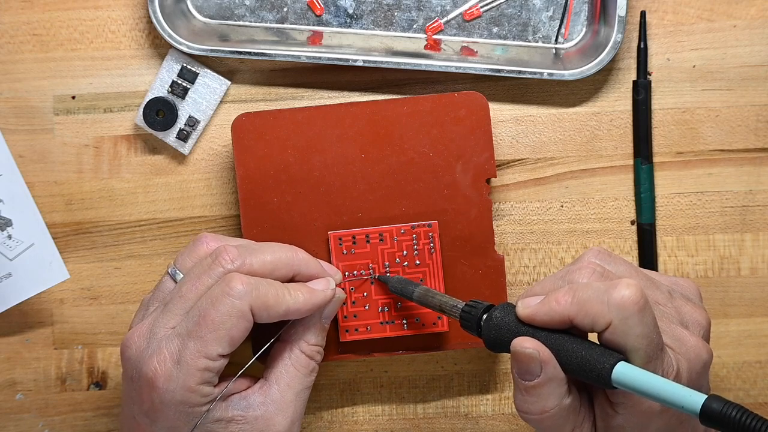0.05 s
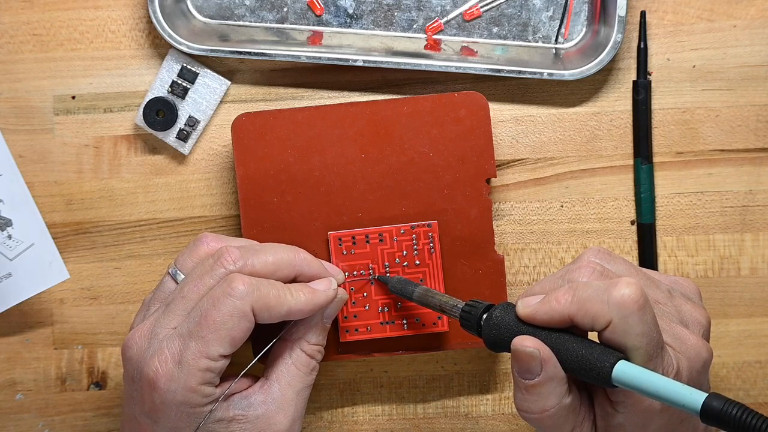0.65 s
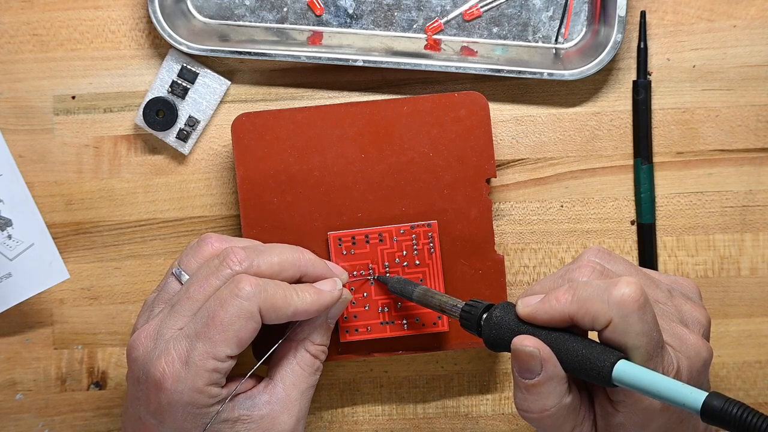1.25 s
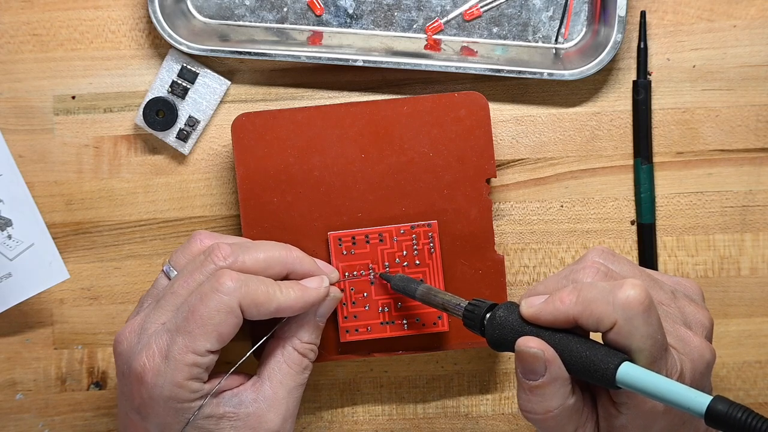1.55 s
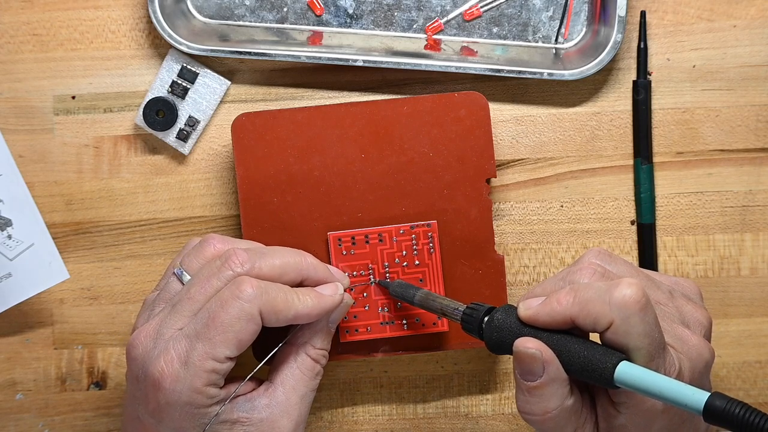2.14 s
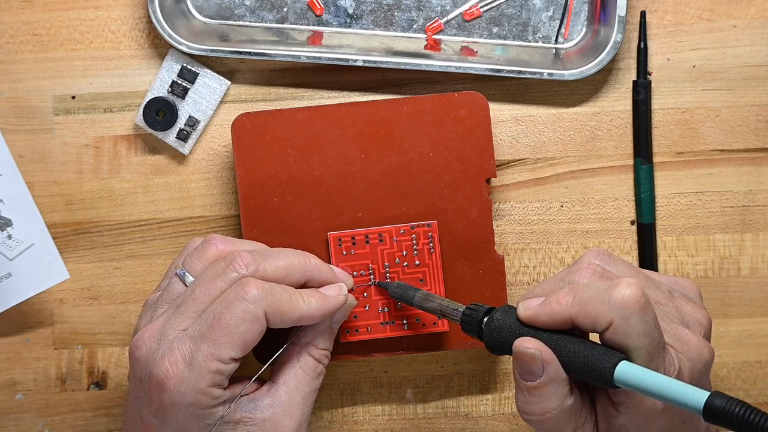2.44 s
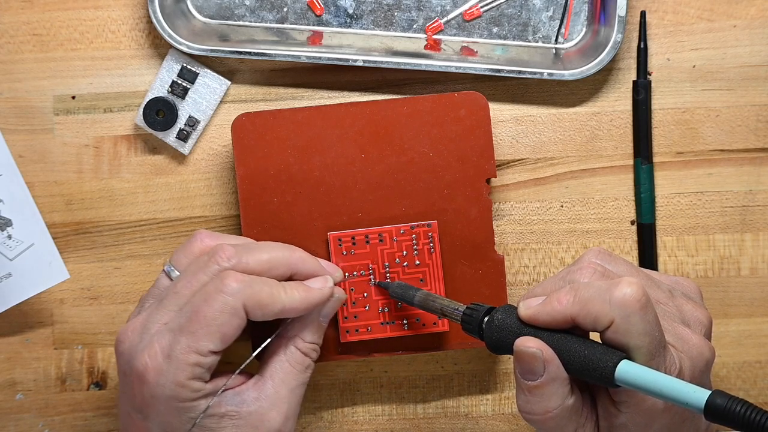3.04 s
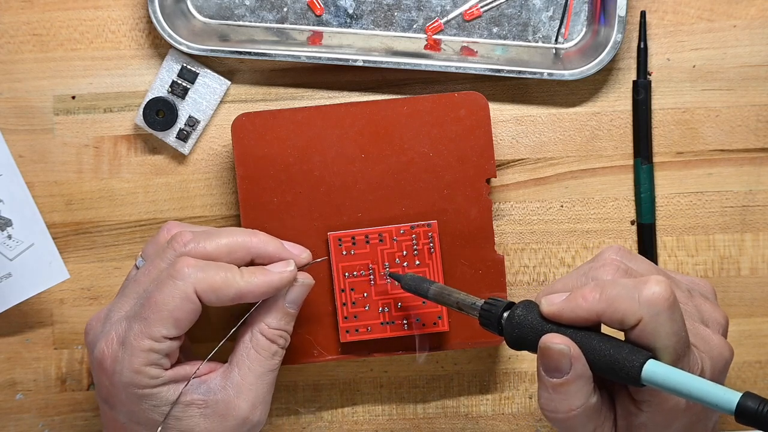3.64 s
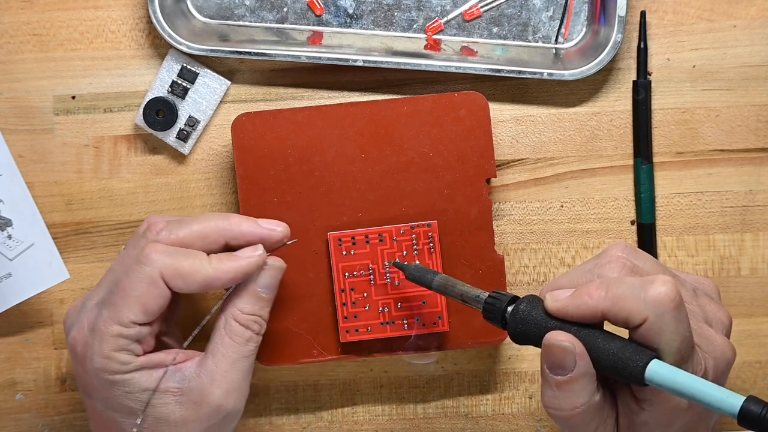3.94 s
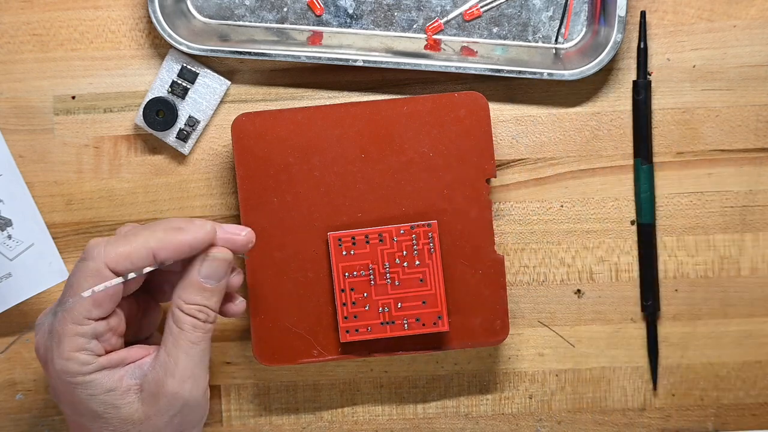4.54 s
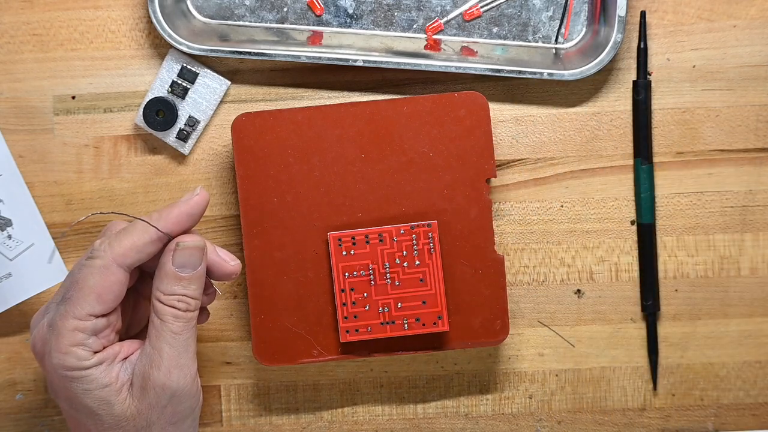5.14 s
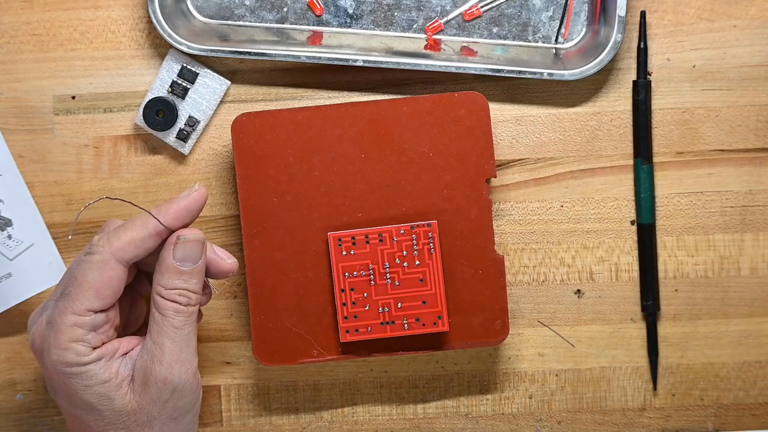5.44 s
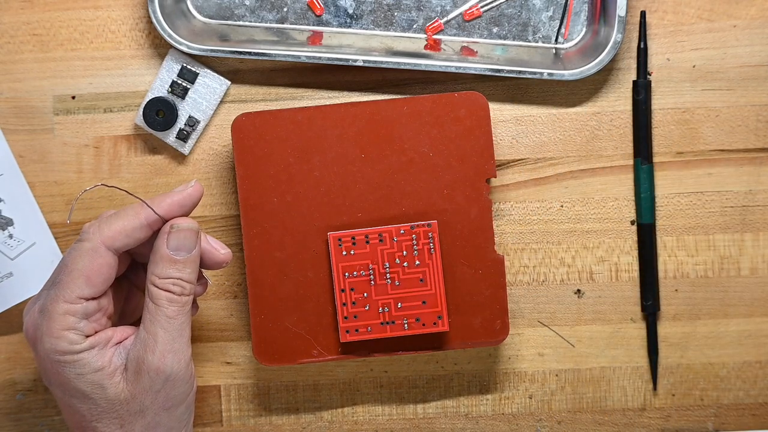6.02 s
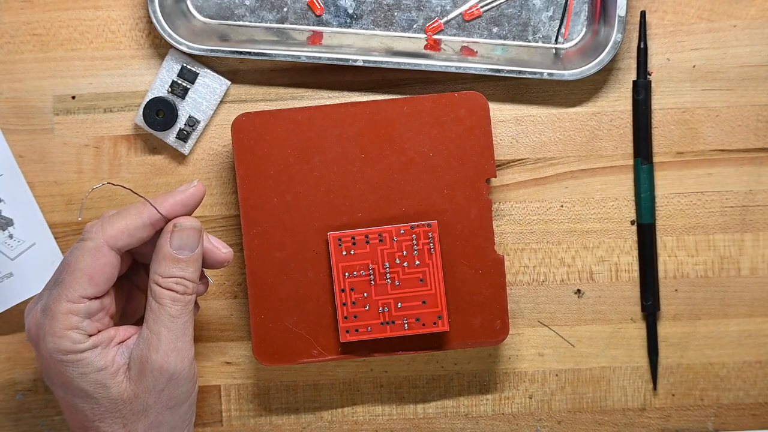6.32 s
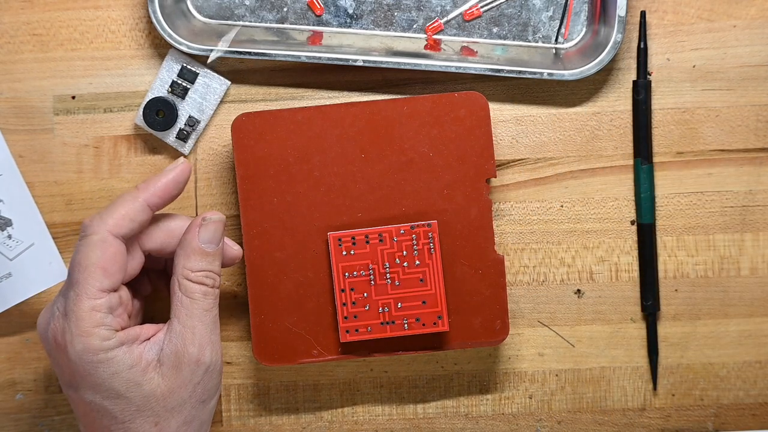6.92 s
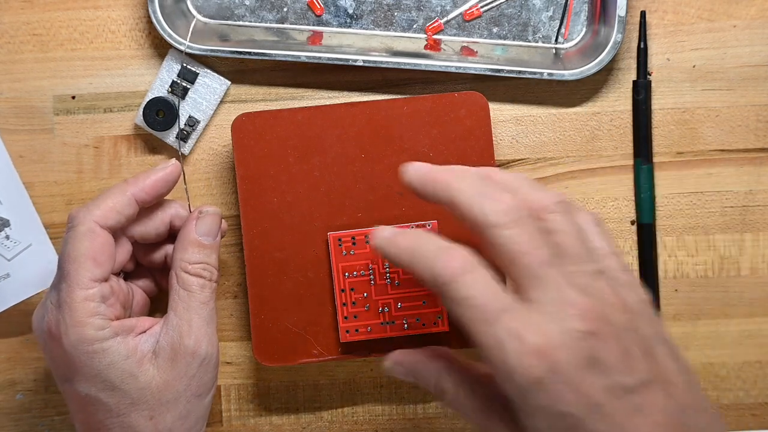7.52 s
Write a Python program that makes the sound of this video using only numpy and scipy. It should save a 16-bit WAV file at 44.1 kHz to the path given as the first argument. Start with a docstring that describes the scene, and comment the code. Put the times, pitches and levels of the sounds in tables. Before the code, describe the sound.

Quiet workroom air, microphone hiss, a low hum and a faint electronic whine run throughout; everything is small, close and nearly mono. At about 1.4 seconds a soldering iron's tip gives a very short, high, rising squeak on a pin, followed by a tiny puff of flux. Light ticks on the circuit board follow until 1.7 seconds, with fainter ones near 2.4 and 3.4. Around 4.2 seconds comes a cluster of sharper ticks, while a hand starts brushing softly over the wooden bench. Near 4.9 seconds the iron scrapes once in its metal stand, and the wood takes a knock at 5.5. From 6.1 to 6.7 seconds the iron scrapes and rattles in the stand, the metal ringing briefly over soft bench thuds. From 7.1 seconds a hand brushes toward the board, with a soft knock and three ticks around 7.6.

```python
"""Soldering at a wooden bench, in quiet room air, microphone hiss, hum and a faint electronic whine.
First the iron's tip squeaks on a pin by stick-slip, flux puffs, and the tip ticks on the circuit board.
From 4 s a hand brushes over the bench and the wood takes a few knocks. Near 4.9 s, and from 6.1 to 6.7 s,
the iron scrapes and rattles in its ringing metal stand while the bench top thuds. Last, a hand reaches
for the board, with a soft knock and three more ticks. The sound is close and nearly mono."""
import sys
import numpy as np
from scipy import signal
from scipy.fft import rfft, irfft, next_fast_len
from scipy.io import wavfile
from scipy.ndimage import uniform_filter1d, map_coordinates

SR = 44100
rng = np.random.default_rng(int(sys.argv[2]) if len(sys.argv) > 2 else 0)


def unload_audio(sound):
    """Save the sound as a 16-bit wav file, at the path given as the first command line argument."""
    columns = np.transpose(np.atleast_2d(sound))
    # keep every value between -1 and 1, then stretch to whole-number steps
    steps = np.round(np.clip(columns, -1, 1) * 32767)
    wavfile.write(sys.argv[1], SR, steps.astype(np.int16))


N = 342769

# spectrum of a contact on the board: f/Hz, level/dB
CONTACT_COLOUR = [(150, -31), (1000, -21), (2200, -12.5), (3500, -5.5), (6000, -2.5), (10400, 2.5),
                  (11800, -8), (16000, -15)]
# strokes of the iron in its stand: t/s, strike/dB, delay to hardest point/s, slide rise/s, slide/dB,
# loss per rebound/dB, ring/dB, thud/dB, thud t60/s
STAND_STROKES = [(4.8635, -37, .018, .012, -42, 16, -1.5, -47.5, .5),
                 (6.132, -41.5, .043, .022, -47, 22, 2, -41.5, .3),
                 (6.2163, -41.5, .012, .006, -48, 20, -9, -60, .2),
                 (6.236, -42, .032, .010, -47, 6, 3.5, -47, .22),
                 (6.380, -41.5, .027, .010, -39, 5.5, 5.5, -41, .42),
                 (6.564, -55, .010, .008, -51, 20, 3, -51, .3),
                 (6.576, -38.5, .012, .009, -33.5, 8, -.5, -44.5, .42),
                 (6.706, -63, .016, .014, -58.5, 20, 11, -43, .27)]


def amp(db):
    """Decibels to gain."""
    return 10 ** (np.asarray(db) / 20)


def unit(x):
    """Scale to rms 1."""
    return x / np.sqrt(np.mean(x ** 2) + 1e-20)


def along(points, hz):
    """(f/Hz, value) points read on a log axis."""
    f, v = np.transpose(points)
    return np.interp(np.log(hz + 1), np.log(f + 1), v)


def bump(hz, centre_hz, octaves):
    """Bell of height 1 in log frequency."""
    return np.exp(-.5 * (np.log2((hz + 1) / centre_hz) / octaves) ** 2)


def clock(size):
    """Sample times in seconds."""
    return np.arange(size) / SR


def fade(t, t60):
    """Exponential decay."""
    return np.exp(-np.log(1000) * t / max(t60, 1e-4))


def swell(t, middle_s, width_s):
    """Bell of height 1 in time."""
    return np.exp(-.5 * ((t - middle_s) / width_s) ** 2)


def envelope(t, rise_s, t60, hold_s=0):
    """Linear rise, hold, exponential release."""
    return np.minimum(t / max(rise_s, 1e-4), 1) * fade(np.maximum(t - rise_s - hold_s, 0), t60)


def filtered(x, response):
    """Zero-phase filter of gain response(hz)."""
    size = x.shape[-1]
    padded = next_fast_len(size + 8192)
    return irfft(rfft(x, padded) * response(np.fft.rfftfreq(padded, 1 / SR)), padded)[..., :size]


def causal(x, colour):
    """Minimum-phase filter of gain colour(hz) in dB."""
    size = len(x)
    cepstrum = irfft(np.log(amp(colour(np.fft.rfftfreq(size, 1 / SR)))), size)
    cepstrum[1:size // 2] *= 2
    cepstrum[size // 2 + 1:] = 0
    return irfft(rfft(x) * np.exp(rfft(cepstrum)), size)


def noise(colour, size):
    """Noise of rms 1, shaped by colour(hz) in dB."""
    return unit(filtered(rng.standard_normal(size), lambda hz: amp(colour(hz))))


def burst(shape):
    """Random force under an envelope, with that envelope's energy."""
    force = shape * rng.standard_normal(len(shape))
    return force * np.linalg.norm(shape) / np.linalg.norm(force)


def ring(modes, t, scatter_db):
    """Damped modes, struck with new strengths each time."""
    return sum(amp(db + scatter_db * rng.standard_normal()) * fade(t, t60)
               * np.sin(2 * np.pi * (hz * t + rng.random())) for hz, db, t60 in modes)


def add(track, at_s, sound):
    """Mix a sound into the track."""
    start = round(at_s * SR)
    track[start:start + len(sound)] += sound[:N - start]


def background():
    """Room air and microphone hiss, with steady mains hum and electronic whine."""
    # noise density: f/Hz, level/dB
    air = [(15, -55), (25, -30), (48, -13), (122, -1), (148, -13), (178, -2.5), (209, -4.5), (281, 1),
           (457, -3), (782, -3.5), (848, -5), (1570, -6.5), (5280, -10), (8130, -9), (15500, -10)]
    # resonances in the hiss: f/Hz, width/Hz, lift/dB
    hiss_peaks = [(8250, 180, 3.5), (9760, 550, 3.5)]
    # left-right likeness: f/Hz, correlation
    likeness = [(60, 1), (160, 0.81), (300, 0.9), (700, 0.67), (2000, 0.63), (5500, 0.71), (8000, 1),
                (15000, 1)]
    # hum and whine: f/Hz, rms level/dB
    tones = [(59, -81), (800, -82), (1600, -78), (2400, -80), (3200, -80), (8000, -72), (8800, -83),
             (9600, -82), (10001, -77), (12000, -80)]
    air_rms_db = -55.5

    def mid_side_gains(hz):
        peaks_db = sum(db / (1 + (2 * (hz - centre) / width) ** 2) for centre, width, db in hiss_peaks)
        angle = np.arccos(np.clip(along(likeness, hz), -1, 1)) / 2
        return amp(along(air, hz) + peaks_db) * [np.cos(angle), np.sin(angle)]

    mid, side = filtered(rng.standard_normal((2, N)), mid_side_gains)
    whine = sum(np.sqrt(2) * amp(db) * np.sin(2 * np.pi * (hz * clock(N) + rng.random()))
                for hz, db in tones)
    return amp(air_rms_db) * unit(np.array([mid + side, mid - side])) + whine


def room(x):
    """Short tail of a small workroom, nearly the same left and right."""
    # reverberation: f/Hz, t60 before scaling/s
    decay = [(200, 0.64), (2000, 0.15), (10000, 0.28)]
    t60_scale, predelay_samples = .81, 200
    hz, t, spectra = signal.stft(rng.standard_normal((2, SR // 2)), SR, nperseg=256)
    tail = signal.istft(spectra * fade(t / along(decay, hz)[:, None], t60_scale), SR, nperseg=256)[1]
    delayed = np.pad(x, (predelay_samples, 0))[None]
    mid, side = signal.fftconvolve(delayed, tail / np.linalg.norm(tail[0]), axes=1)[:, :N]
    return mid + amp(-32) * np.array([side, -side])


def hands():
    """Skin and sleeve brush the bench, swelling and fading with each sweep."""
    # sweeps: middle t/s, level/dB, half length/s, treble lift/dB
    sweeps = [(2.99, -65, .09, -10), (4.06, -59, .19, 3), (4.65, -61, .11, 3), (5.2, -64, .4, -4),
              (7.12, -60.5, .13, 2), (7.6, -57.5, .22, -1.5)]
    # brushing spectrum: f/Hz, level/dB
    brush_colour = [(40, -23), (150, -2.5), (280, 5), (700, 0), (1500, -1.5), (3000, -6), (6000, -8.5),
                    (9300, -3.5), (11500, -9), (15000, -22)]
    flutter_hz, t = 25, clock(N)
    flutter_db = 1.3 * map_coordinates(rng.standard_normal(N // 1000), [t * flutter_hz])
    brush = lambda lift_db: noise(lambda hz: along(brush_colour, hz) + lift_db * bump(hz, 9000, .6), N)
    return amp(flutter_db) * sum(amp(db) * swell(t, middle_s, width_s) * brush(lift_db)
                                 for middle_s, db, width_s, lift_db in sweeps)


def knocks():
    """A hard blow on wood: a crack and a few bench modes."""
    # blows: t/s, relative level/dB
    blows = [(4.107, -52), (5.4741, -34.5), (5.583, -56), (7.375, -52)]
    # crack spectrum: f/Hz, level/dB
    crack_colour = [(40, -23), (120, -13), (350, -6), (560, -11), (800, 1), (1500, 4.5), (2500, -8),
                    (3700, -3.5), (5400, -17), (8800, -3.5), (10200, -12), (11500, -24), (16000, -31)]
    # bench modes: f/Hz, level/dB, t60/s
    bench_modes = [(204.5, -4.5, 0.18), (242, -5, 0.15), (326, -5, 0.21), (377, -5, 0.065),
                   (1050, 5, 0.055), (1480, -8, .04), (2070, 4, 0.057), (3850, -12, .32)]
    out, t = np.zeros(N), clock(12000)
    for at_s, db in blows:
        force = burst(fade(t, .021) + amp(-13) * fade(t, .13))
        crack = amp(13.5) * causal(force, lambda hz: along(crack_colour, hz))
        wood = amp(-7.5) * ring(bench_modes, t, scatter_db=1)
        add(out, at_s, amp(db) * (1 - fade(t, .007)) * (crack + wood))
    return out


def thuds():
    """The bench top answers each stroke in the stand with many close, low modes."""
    # thud spectrum: f/Hz, level/dB
    thud_colour = [(35, -42), (70, -20), (140, -13), (210, -5), (310, -2.5), (420, 1), (580, -4),
                   (750, -17.5), (1200, -14), (1800, -38.5), (4000, -44)]
    out, t = np.zeros(N), clock(16384)
    for at_s, *_, db, t60 in STAND_STROKES:
        wood = noise(lambda hz: along(thud_colour, hz), len(t))
        add(out, at_s, amp(db) * (1 - fade(t, .042)) * fade(t, t60) * wood)
    return out


def stand_contacts():
    """Strike, slide, two rebounds per stroke: t/s, level/dB, rise/s, t60/s, brightest f/Hz, ring/dB."""
    strike_rise_s, strike_t60_s, strike_hz = .0008, .09, 6000
    slide_t60_s, slide_hz = .06, 10300
    rebound_gap_s, rebound_rise_s, rebound_t60_s, rebound_ring_db = .027, .003, .075, 3.5
    for at_s, strike_db, delay_s, rise_s, slide_db, loss_db, ring_db, *_ in STAND_STROKES:
        hardest_s = at_s + delay_s
        yield at_s, strike_db, strike_rise_s, strike_t60_s, strike_hz, ring_db
        yield hardest_s - rise_s, slide_db, rise_s, slide_t60_s, slide_hz, ring_db
        for k in (1, 2):
            rebound_s = hardest_s + k * rebound_gap_s - rebound_rise_s
            yield rebound_s, slide_db - k * loss_db, rebound_rise_s, rebound_t60_s, slide_hz, rebound_ring_db


def scrapes():
    """The barrel catches and slips in the stand; the rough contact keeps the metal ringing."""
    # stand modes: f/Hz, share of the ring/dB, t60/s
    stand_modes = [(427, -6.5, .25), (1170, -8, .1), (1320, -8.5, .07), (1445, -11, .1), (2062, -3, .16),
                   (2141, .5, .16), (3720, -7, .2), (3770, -8.5, .24), (4250, -9.5, .09), (4802, -4, .12),
                   (5630, -10, .04), (6176, -9, .09), (6820, -9, .06), (6910, -8, .07), (7760, -9, .07),
                   (8650, -10, .04), (9290, -8, .06), (9640, -7, .05), (9788, -6, .06), (9980, -5.5, .06),
                   (10925, -3.5, .06), (11610, -7, .05), (11900, -9, .04)]
    # spectrum of rubbing metal: f/Hz, level/dB
    rub_colour = [(80, -32), (300, -16), (700, -12), (1250, 4), (1750, -8), (3300, -9.5), (4400, 1.5),
                  (8000, -2.5), (11800, -2.5), (13000, -16), (16000, -23)]
    firm_db, dulling_per_octave = -46, .5  # ring's treble loss in dB per dB below a firm contact
    out, t = np.zeros(N), clock(10240)
    mode_hz, mode_db, _ = np.transpose(stand_modes)
    treble_octaves = np.log2(np.maximum(mode_hz / 2500, 1))
    responses = rfft([fade(t, t60) * np.cos(2 * np.pi * hz * t) for hz, _, t60 in stand_modes])
    for at_s, db, rise_s, t60, bright_hz, ring_db in stand_contacts():
        stroke = envelope(t, rise_s, t60)
        grain_db = 2.2 * unit(uniform_filter1d(rng.standard_normal(len(t)), size=60))
        friction = stroke * unit(amp(grain_db))
        rub = friction * noise(lambda hz: along(rub_colour, hz) + 8 * bump(hz, bright_hz, .18), len(t))
        ringing = irfft(rfft(burst(friction)) * responses)
        # the modes share the stroke's energy
        dull_db = dulling_per_octave * max(firm_db - db, 0) * treble_octaves
        lift_db = 1.7 * bump(mode_hz, bright_hz, .086)
        share = amp(mode_db - dull_db + lift_db + rng.standard_normal(len(mode_hz)))
        gains = share / np.linalg.norm(share) * np.linalg.norm(stroke) / np.linalg.norm(ringing, axis=1)
        add(out, at_s, amp(db) * (rub + amp(ring_db) * (gains @ ringing)))
    return out


def squeak():
    """Fast stick-slip of the tip gives a rising whistle; the pin rings on and boiling flux puffs."""
    at_s, squeak_db, from_hz, to_hz = 1.379, -28, 7420, 7920
    rise_s, hold_s, slip_t60_s = .0095, .0045, .017
    pin_db, pin_t60_s, friction_db = -13, .055, -13.5
    flux_at_s, flux_width_s, flux_db = 1.426, .009, -49.5
    out, t = np.zeros(N), clock(8192)
    slip = envelope(t, rise_s, slip_t60_s, hold_s)
    pin = amp(pin_db) * envelope(t, rise_s, pin_t60_s, hold_s)
    pitch_hz = np.interp(t, [0, rise_s + hold_s], [from_hz, to_hz])
    jitter = .008 * noise(lambda hz: -20 * np.log10(1 + (hz / 500) ** 2), len(t))
    whistle = np.sqrt(2) * np.sin(2 * np.pi * np.cumsum(pitch_hz * (1 + jitter)) / SR)
    friction = amp(friction_db) * noise(lambda hz: 36 * bump(hz, 9200, .64), len(t))
    puff = amp(flux_db) * swell(at_s + t, flux_at_s, flux_width_s)
    flux = puff * noise(lambda hz: along(CONTACT_COLOUR, hz), len(t))
    add(out, at_s, amp(squeak_db) * np.maximum(slip, pin) * (whistle + friction) + flux)
    return out


def ticks():
    """Each contact on the board is a sharp push, a short chatter and the board's ring."""
    # contacts: t/s, relative level/dB, brightest f/Hz, body lift/dB
    touches = [(1.4614, -30.5, 9600, 10), (1.484, -36.5, 5700, 2), (1.6735, -26.5, 10000, 3),
               (1.734, -25.5, 10200, 0), (2.3738, -41.5, 8200, 5), (2.3826, -39, 8500, 0),
               (3.4148, -39.5, 8800, -8), (4.1067, -38, 8300, 5), (4.1573, -24, 6600, 4),
               (4.175, -15.7, 9600, -1), (4.2105, -25, 9800, 8), (4.2575, -31.5, 3800, 3),
               (4.3893, -27.5, 9600, 0), (7.5291, -34, 5700, 9), (7.623, -25, 5100, 3),
               (7.667, -38, 5000, 13)]
    # modes of board and pins: f/Hz, level/dB, t60/s
    board_modes = [(2870, -12.5, 0.076), (3590, 2.5, 0.04), (4880, -1, .02), (5870, 3.5, 0.03),
                   (7700, -10, .025), (8050, 10, 0.028), (9120, 1, .03), (9300, 1, 0.023)]
    chatter_db, board_db, trim_db = -6, -20.5, -4
    out, t = np.zeros(N), clock(4096)
    for at_s, db, bright_hz, body_db in touches:
        colour = lambda hz: (along(CONTACT_COLOUR, hz) + 6 * bump(hz, bright_hz, .16)
                             + body_db * bump(hz, 3900, .44))
        force = burst(fade(t, .0043)) + amp(chatter_db) * burst(fade(t, .04))
        force[0] += 4.5  # first push
        board = (1 - fade(t, .0024)) * ring(board_modes, t, scatter_db=3.5)
        add(out, at_s, amp(db + trim_db) * (causal(force, colour) + amp(board_db) * board))
    return out


def scene():
    """Work on the board is close; stand and bench are slightly wetter."""
    near = ticks() + squeak() + hands()
    far = scrapes() + thuds() + knocks()
    return near + far + room(amp(-17.5) * near + amp(-16.5) * far) + background()


def record(dry):
    """The recorder keeps nothing above its band limit."""
    top_hz = 15900
    return filtered(dry, lambda hz: hz < top_hz)


dry = scene()
out = record(dry)
unload_audio(out)
```